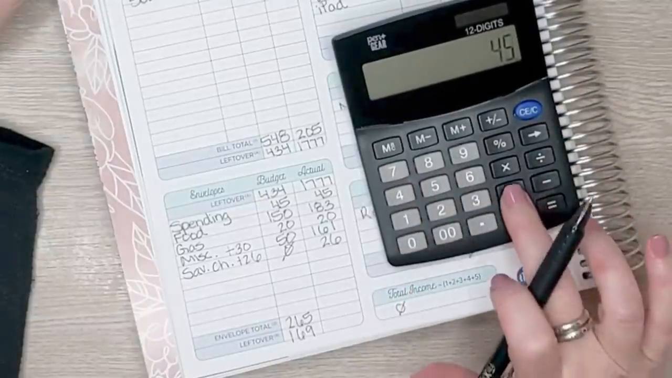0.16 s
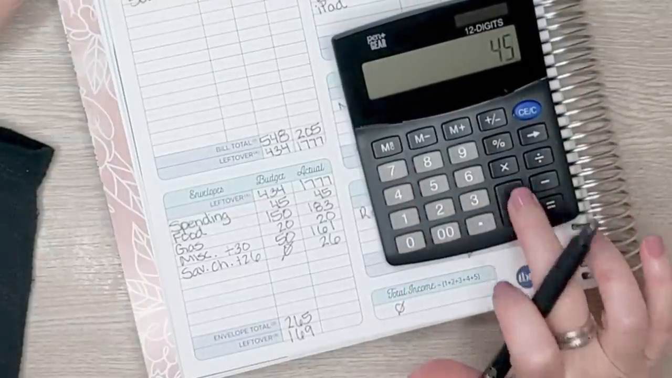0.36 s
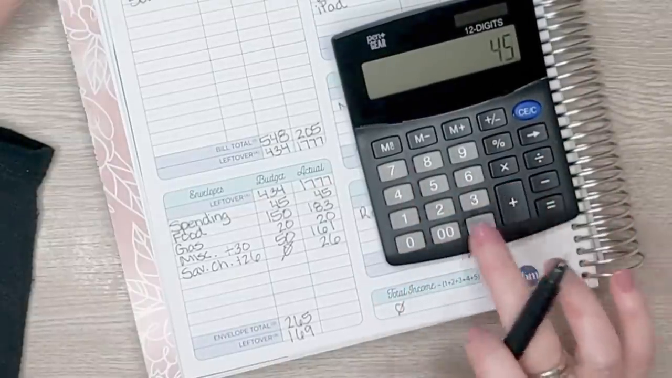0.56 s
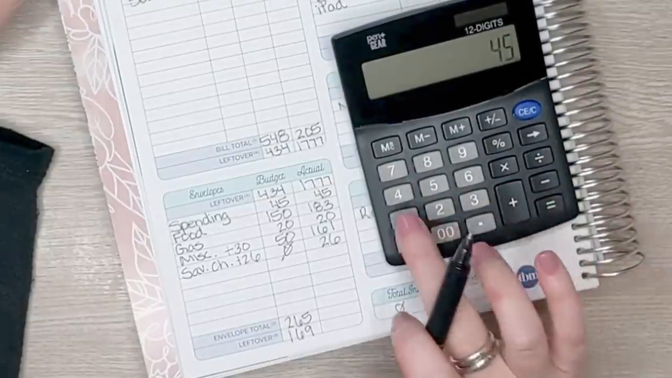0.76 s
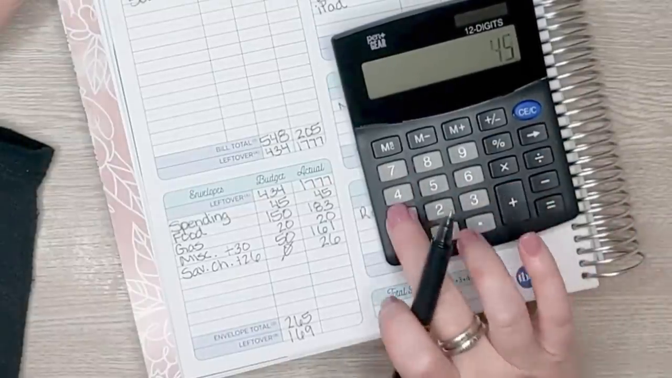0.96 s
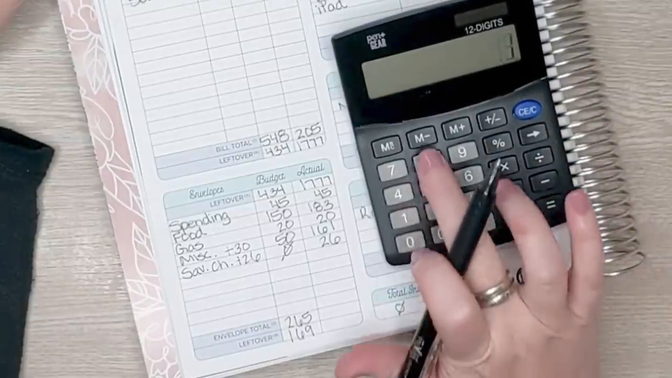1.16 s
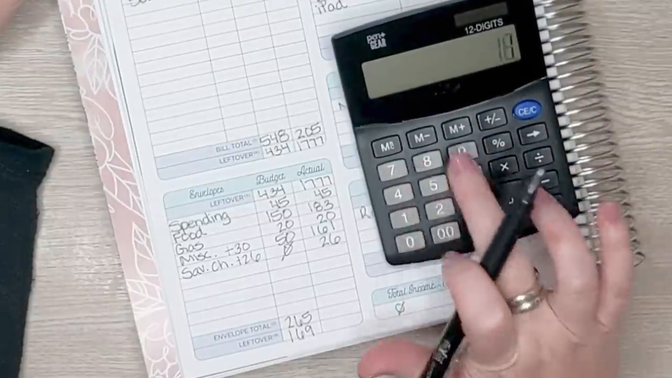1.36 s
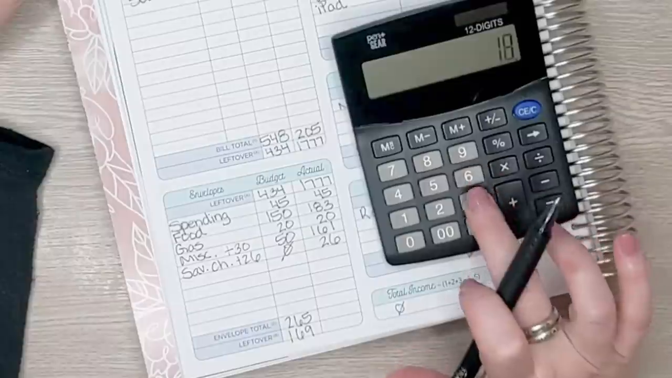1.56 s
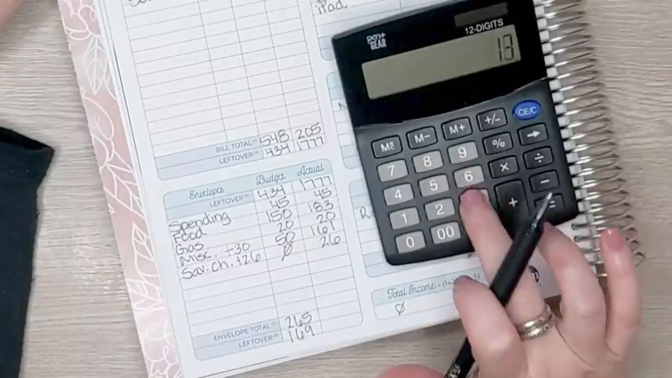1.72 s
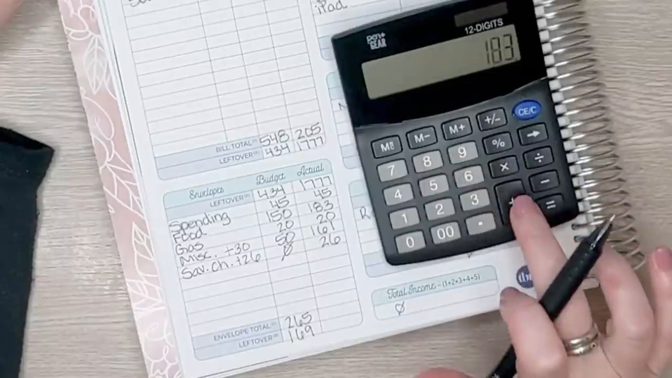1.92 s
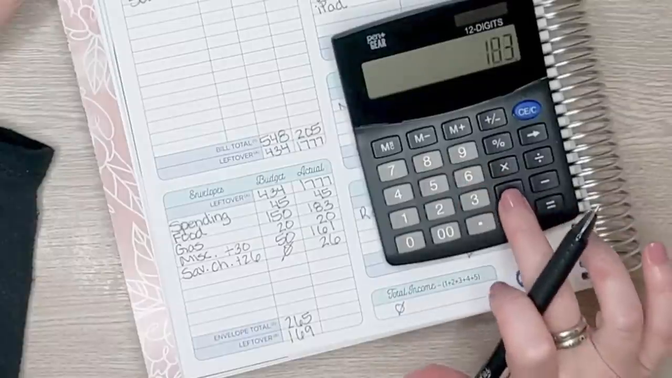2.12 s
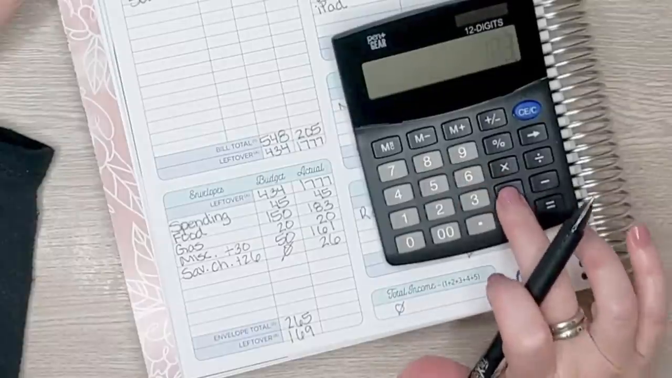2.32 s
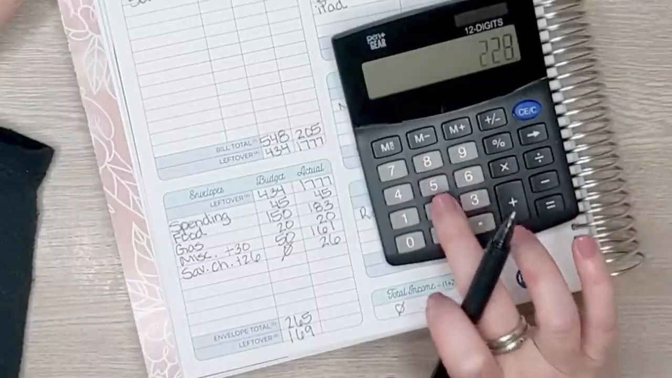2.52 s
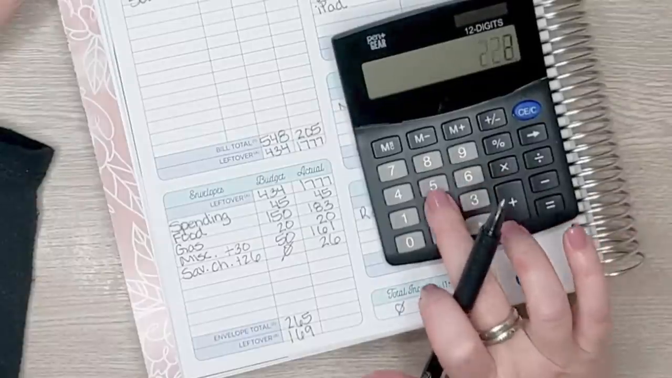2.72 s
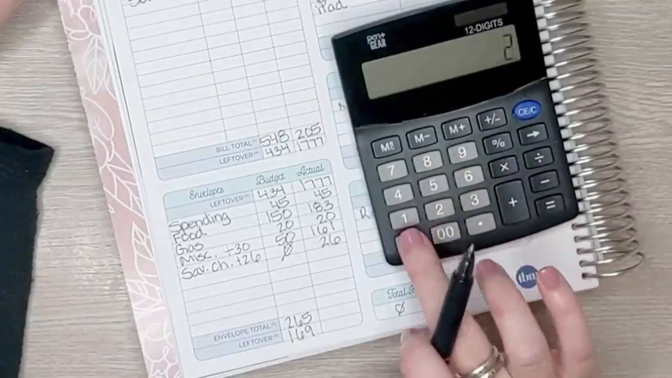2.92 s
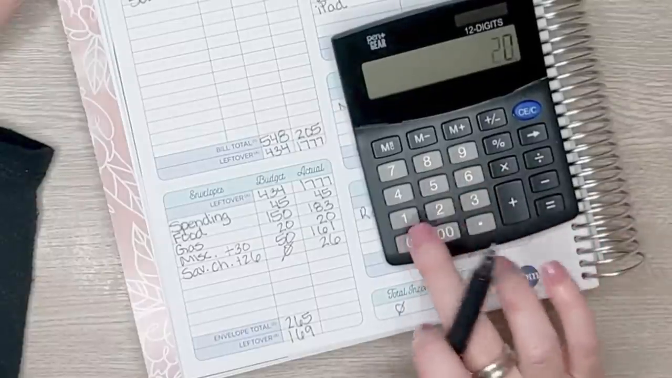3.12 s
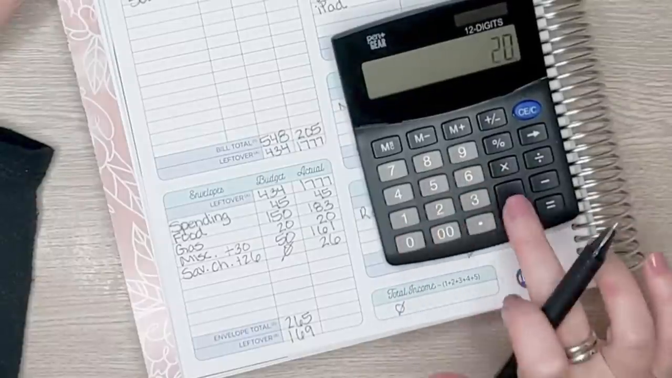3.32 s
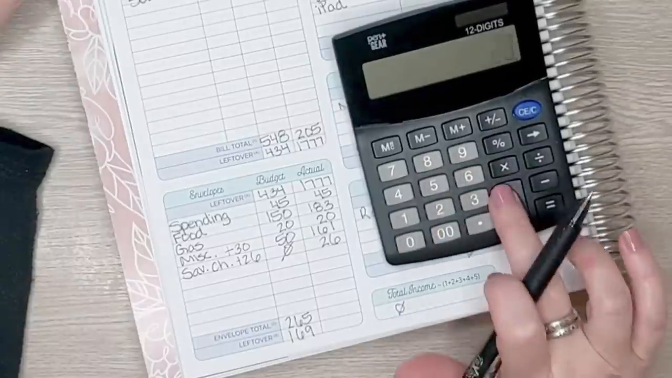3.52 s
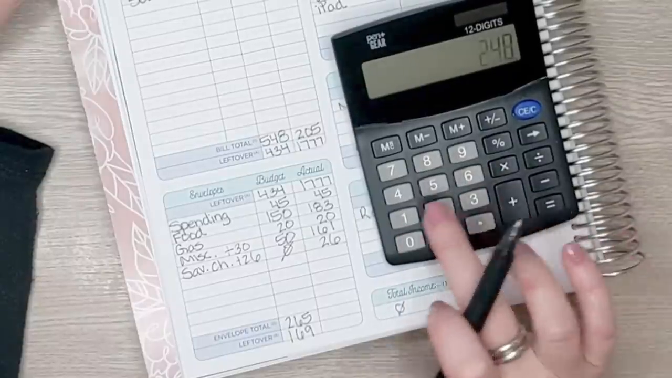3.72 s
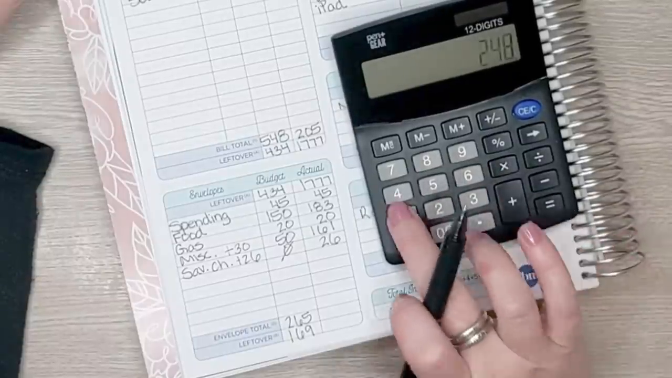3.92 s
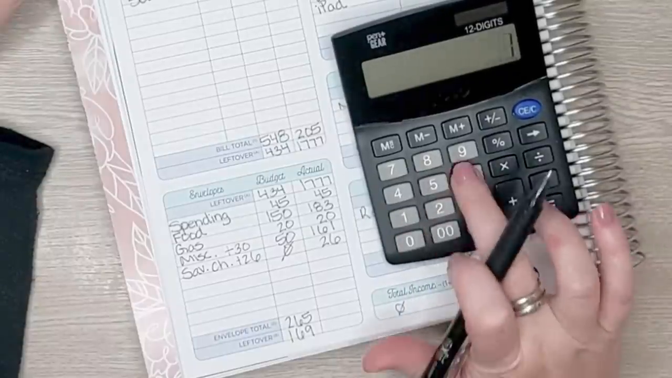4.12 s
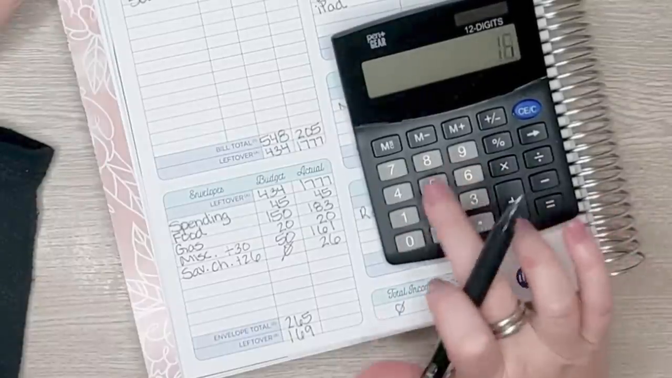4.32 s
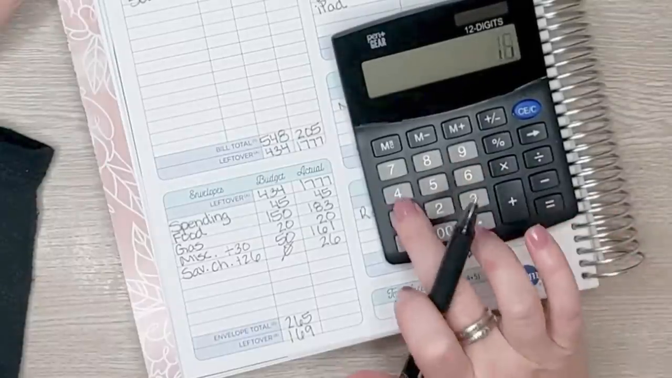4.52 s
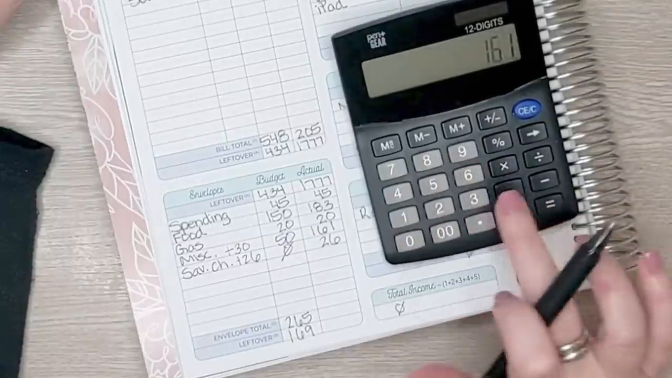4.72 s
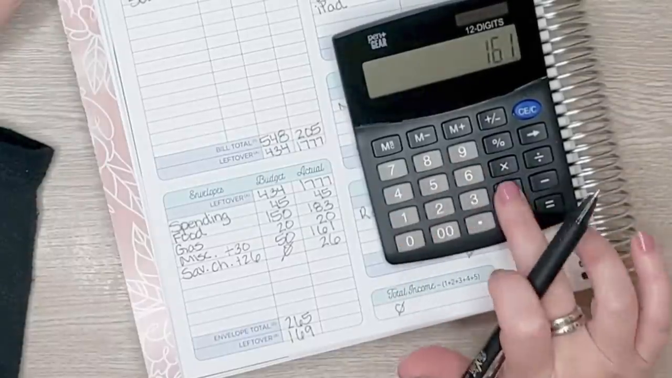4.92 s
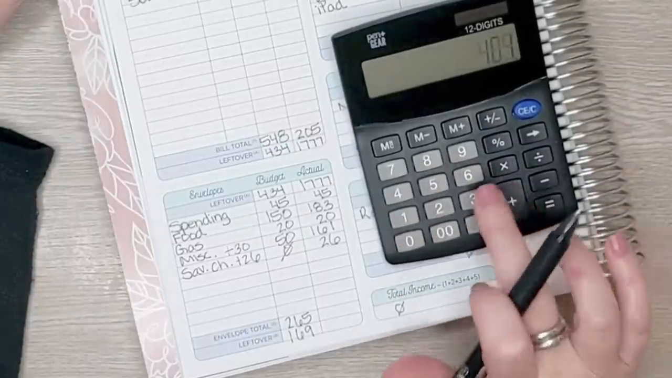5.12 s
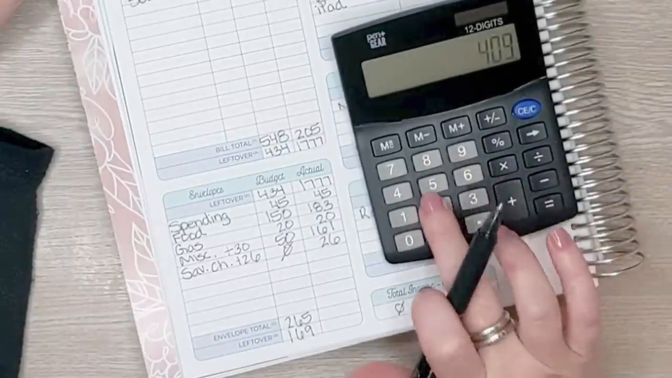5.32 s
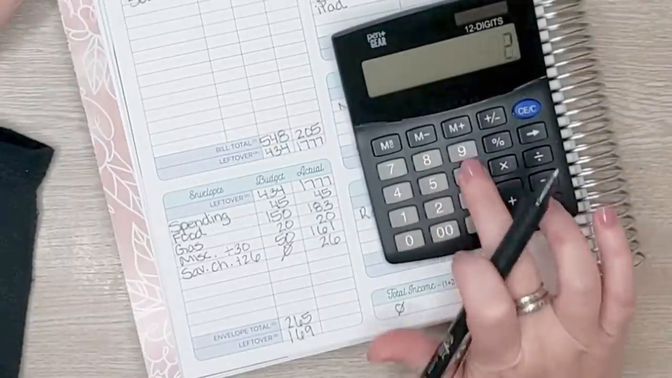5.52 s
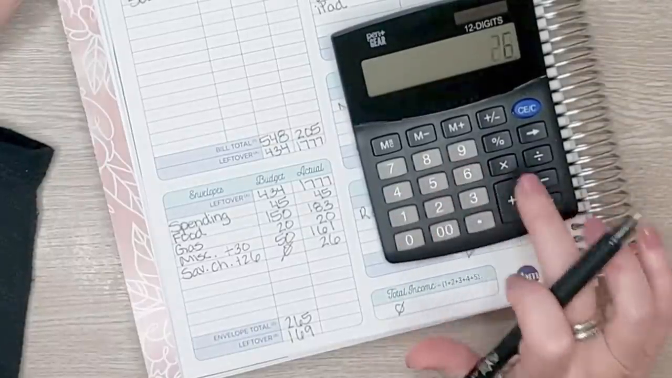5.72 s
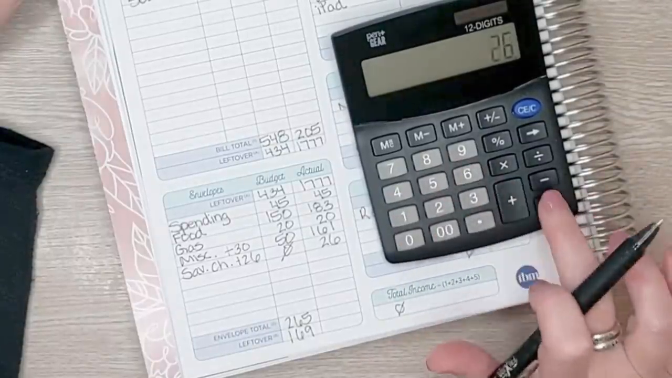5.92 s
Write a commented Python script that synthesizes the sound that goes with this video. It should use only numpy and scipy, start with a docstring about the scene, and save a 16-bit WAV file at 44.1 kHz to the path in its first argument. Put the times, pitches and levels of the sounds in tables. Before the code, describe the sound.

The plastic keys of a desk calculator are pressed about fourteen times, close to the microphone. Each press is a tiny scrape and a short clack, followed roughly a tenth of a second later by a brighter click as the key springs back. Some presses add a soft, hollow thump on the desk. A firm press opens at 0.3 seconds, then lighter ones come at 1.0, 1.3 and 1.7. Another at 2.3 has a sharp release. Presses follow at 2.7, 3.1 and 3.6, then quicken at 4.0, 4.3 and 4.6. A firm, scraping press at 5.0 ends in a snappy release and a brief finger slide around 5.2. Two last presses land at 5.4 and 5.6. Throughout, the hand brushes very softly over keys and paper. The small, quiet room gives each click a short echo, above a low rumble, thin hiss and faint motor hum.

```python
"""Desk calculator keys

A finger works the plastic keys of a calculator lying on a paper planner, close to a phone.
Each key scrapes in its guide, bottoms out with a clack that rings case and room and thumps the desk,
then springs back with a brighter click. The small, quiet room answers every click over the soft
brush of the hand, a low rumble and a faint motor hum."""
import sys
import numpy as np
from scipy import signal
from scipy.fft import rfft, irfft, next_fast_len
from scipy.io import wavfile

SR = 44100
rng = np.random.default_rng(int(sys.argv[2]) if len(sys.argv) > 2 else 0)


def wrap_up_sound(samples):
    """Save the sound to the file named by the first command line argument, as 16-bit audio."""
    columns = np.atleast_2d(samples).T
    # keep every value between -1 and 1, then stretch to whole-number steps
    tamed = np.clip(columns, -1, 1)
    steps = np.round(tamed * 32767).astype(np.int16)
    wavfile.write(sys.argv[1], SR, steps)


N = 267290


def undb(db):
    """Decibels to gain."""
    return 10 ** (np.asarray(db) / 20)


def rms(x):
    """Root mean square."""
    return np.sqrt(np.mean(x ** 2)) + 1e-12


def clock(length_s):
    """Sample times over a stretch."""
    return np.arange(int(length_s * SR)) / SR


def fade(t, t60):
    """Exponential decay, 60 dB in t60 seconds."""
    return np.exp(-np.log(1000) * t / t60)


def swell(centre_s, width_s):
    """A smooth rise and fall, 1 at its centre."""
    return np.exp(-((np.arange(N) / SR - centre_s) / width_s) ** 2)


def bump(f, hz, width_hz):
    """Shape of one resonance, 1 at its centre."""
    return 1 / (1 + (2 * (f - hz) / width_hz) ** 2)


def along(points, hz):
    """Read (Hz, value) points on a log-frequency axis."""
    f, value = np.transpose(points)
    return np.interp(np.log(np.maximum(hz, 1)), np.log(f), value)


def colour(x, points, depth=1, lag_s=0):
    """EQ by (Hz, dB) points scaled by depth, with an optional delay."""
    size = next_fast_len(x.shape[-1])
    f = np.arange(size // 2 + 1) * SR / size
    response = undb(depth * along(points, f)) * np.exp(-2j * np.pi * f * lag_s)
    return irfft(rfft(x, size) * response, size)[..., :x.shape[-1]]


def add(track, start_s, x):
    """Mix a sound in at a time."""
    i = int(start_s * SR)
    track[..., i:i + x.shape[-1]] += x[..., :N - i]


# keys hitting their stop:
# start_s, key, strength_db, bright_db_per_octave, snap_db, cap_hz, cap_db, scrape_db
PRESSES = [(0.319, "+", -36.5, -1.5, -0.5, 2920, 10.5, -43), (1.011, "1", -47.5, 0.5, 4, 1150, 5, -42),
           (1.318, "8", -49, -3, -9, 930, 9.5, -43.5), (1.7232, "3", -50.5, 2, 0, 2200, 6.5, -51),
           (2.3223, "+", -47.5, -2.5, -2, 860, 11, -41.5), (2.7415, "2", -46, 1.3, 1, 1240, 9.5, -38),
           (3.063, "0", -50, 0.5, -7, 1280, 4.5, -51), (3.5763, "+", -45, 1.2, -0.5, 1200, 6, -58),
           (3.9772, "1", -47, .5, 2, 1000, 2, -54), (4.2557, "6", -45, -1.1, 2, 865, 2, -37.5),
           (4.5543, "1", -40, -2.3, 9, 1200, 8, -55), (5.039, "+", -40, -2, -2, 1270, 3, -29),
           (5.3805, "2", -50.5, 1.8, -11, 1480, 8.5, -49), (5.634, "6", -40.5, 1, 4, 1530, 0.5, -56)]
# tone of a press, against its strength: level_db for each register (body, knock, clack, tick, edge)
PRESS_TONE = [-11.5, 0, 0, -4.5, -16]
# hollow knock of the calculator's foot, against the thump: level_db for each register
FOOT_TONE = [-7, -2.5, -21, -32, -42]


def presses(clicks, desk, left_keys="0124578", rock_db=9.5):
    """Keys bottom out: mixes in their scrapes and thumps, returns blows as (start_s, ring, taps)."""
    blows = []
    for start_s, key, strength_db, bright_db, snap_db, cap_hz, cap_db, scrape_db in PRESSES:
        rocks = key in left_keys  # keys on the left rock the calculator more
        thump_db = -60 + 0.63 * (strength_db + 46) + rock_db * rocks  # a medium press is -46 dB
        add(clicks, *scrape(start_s, scrape_db, rise_s=0.0039, rub_db=-39, rub_s=0.008))
        add(desk, start_s + 0.0036, undb(thump_db) * thump())
        ring = click_ring(blow_levels(PRESS_TONE, strength_db, bright_db, snap_db), cap_hz, cap_db)
        # a loosely held key sounds brighter and chatters longer
        chatter_t60 = 0.023 * 2 ** (bright_db / 5.5)
        taps = chatter(chatter_t60, strike_db=-9, seat_s=0.0028, seat_db=-11)
        blows.append((start_s, ring, taps))
        if rocks:  # the foot lands a moment later
            ring = click_ring(np.array(FOOT_TONE) + thump_db, peak_hz=480, peak_db=5.5)
            taps = chatter(t60=0.03, strike_db=-0.5, seat_s=0.0034, seat_db=-19)
            blows.append((start_s + 0.011, ring, taps))
    return blows


# keys springing back: start_s, strength_db, bright_db_per_octave, snap_db, cap_hz, cap_db
RELEASES = [(0.4487, -38.5, 0, 3.5, 1560, 11), (1.1035, -46, 1, -4, 2000, 6),
            (1.411, -44, .5, 7.5, 2100, 1), (1.849, -47, 0, -1, 2400, 2.5), (2.4433, -38, 0.54, 6, 7000, 7),
            (2.873, -49.5, -0.3, -5, 1560, 3), (3.2173, -46.5, 1.8, -5, 480, 14),
            (3.728, -53, -4, -1, 1360, 2), (4.089, -41.5, 0.5, 3, 3550, 6.5),
            (4.362, -51, -1.5, 11.5, 1390, 7), (4.667, -43, 2.2, -5, 1820, 6.5),
            (5.175, -37, 2.5, 2.5, 2420, 5.5), (5.183, -40, -.2, 12, 6800, 11),
            (5.492, -51, 0, -11, 1350, 4), (5.738, -49.5, -4, -1, 2520, 5.5)]
# tone of a release, against its strength: level_db for each register
RELEASE_TONE = [-15, -3, -0.5, -2.5, -17.5]


def releases(clicks):
    """Keys spring back against the face plate: mixes in their scrapes, returns their blows."""
    blows = []
    for start_s, strength_db, bright_db, snap_db, cap_hz, cap_db in RELEASES:
        add(clicks, *scrape(start_s, level_db=-49.5, rise_s=0.0036, rub_db=-16.5, rub_s=0.086))
        ring = click_ring(blow_levels(RELEASE_TONE, strength_db, bright_db, snap_db), cap_hz, cap_db)
        taps = chatter(t60=0.028, strike_db=-18, seat_s=0.0015, seat_db=-7.5)
        blows.append((start_s, ring, taps))
    return blows


# taps of a tilted key's edge: start_s, strength_db, bright_db_per_octave, cap_hz
EDGE_TAPS = [(0.321, -45, -4, 1400), (1.347, -64, 4.5, 800), (1.744, -57, -2, 1150),
             (2.3162, -53, -.5, 1650), (3.209, -49, 1.5, 1320), (3.5706, -49, 3, 3100),
             (4.5495, -47.5, 0.5, 1210)]
# tone of an edge tap, against its strength: level_db for each register
EDGE_TONE = [-4, -1.5, 0, -0.5, -18]


def edge_taps():
    """A key pushed off-centre tilts, and one edge taps just before or after the main blow."""
    blows = []
    for start_s, strength_db, bright_db, cap_hz in EDGE_TAPS:
        ring = click_ring(blow_levels(EDGE_TONE, strength_db, bright_db), cap_hz, peak_db=10)
        taps = chatter(t60=0.019, strike_db=-6.5, seat_s=0.0027, seat_db=-20)
        blows.append((start_s, ring, taps))
    return blows


# the five registers of a click (body, knock, clack, tick, edge): centre_hz, width_hz
REGISTERS = [(450, 450), (1100, 900), (2600, 2400), (6000, 5000), (12500, 7000)]


def blow_levels(tone_db, strength_db, bright_db, snap_db=0):
    """Register levels: a harder contact tilts them upwards, a sharp corner adds snap to the highest."""
    hz = np.transpose(REGISTERS)[0]
    octaves = np.log2(hz / np.median(hz))
    return np.array(tone_db) + strength_db + bright_db * octaves + snap_db * (hz == hz.max())


# resonances of the plastic case and the small room that colour each click: pitch_hz, width_hz, gain_db
CLICK_RESONANCES = [(361, 42, 5.5), (467, 55, 4.5), (492, 43, 5), (589.3, 29, 10), (710, 37, -0.5),
                    (742, 3.2, 10), (817, 65, 6), (874, 18, 5.5), (981, 25, 6), (1130, 70, -1),
                    (1287, 105, 4), (1423, 18, -4), (1760, 125, -2), (2034, 15, 5.5), (2260, 150, 3.5),
                    (2674, 37, 6), (2874, 174, 4), (3090, 50, 6.5), (3410, 770, 6), (4330, 1630, 2),
                    (5840, 2100, 6), (7070, 130, 2.5), (8100, 380, 4), (10100, 3300, 0.5),
                    (13100, 2800, 4.5)]


def click_ring(levels_db, peak_hz, peak_db, attack_s=0.008, low_cut_hz=320, size=4096):
    """The ring of case and room after one tap, with a peak for the key cap or foot that strikes."""
    f = np.arange(size // 2 + 1) * SR / size
    hz, width_hz = np.transpose(REGISTERS)
    # a register's level is its power over the attack, spread across its width
    db = along(np.c_[hz, levels_db + 10 * np.log10(attack_s * SR * SR / 2 / width_hz)], f)
    db += sum(gain_db * bump(f, centre, width) for centre, width, gain_db in CLICK_RESONANCES)
    db += peak_db * bump(f, peak_hz, 0.19 * peak_hz)
    # so small a case radiates little bass
    gain = undb(db) * (f + 1) ** 3 / np.hypot(f ** 3, low_cut_hz ** 3)
    # minimum phase: a sudden start, then the resonances die away
    cepstrum = irfft(np.log(gain + 1e-7))
    cepstrum[1:size // 2] *= 2
    cepstrum[size // 2 + 1:] = 0
    return irfft(np.exp(rfft(cepstrum)))


def chatter(t60, strike_db, seat_s, seat_db, grain_db=2.5, grip_s=0.0008):
    """A loose part strikes, chatters in ever smaller taps and seats with a second blow; unit energy."""
    t = clock(0.03)
    taps = rng.standard_normal(len(t)) * undb(grain_db * rng.exponential(size=len(t)))
    # the chatter builds while the part tilts onto its stop and dies as it seats
    taps *= (1 - np.exp(-t / grip_s)) * fade(np.maximum(t - seat_s / 2, 0), t60)
    taps /= np.linalg.norm(taps)
    taps[int(grip_s * SR)] += undb(strike_db)
    taps[int(seat_s * (0.7 + 0.6 * rng.random()) * SR)] -= undb(seat_db)
    return taps / np.linalg.norm(taps)


def scrape(blow_s, level_db, rise_s, rub_db, rub_s):
    """A key rubs along its guide in tiny slips that swell up to the blow; returns start and sound."""
    t = clock(0.045)
    slips = rng.standard_normal(len(t)) * undb(2 * rng.exponential(size=len(t)))
    slips = colour(slips, [(200, -51), (500, -2), (1300, -1.5), (3300, -1), (7000, -17.5), (15000, -38)])
    envelope = np.exp(-t / rise_s) + undb(rub_db) * np.exp(-t / rub_s)
    rub = undb(level_db) * slips / rms(slips) * envelope
    return blow_s - t[-1], rub[::-1]


def thump(hz=108, rise_s=0.007, t60=0.22):
    """The finger's push rocks calculator and desk."""
    t = clock(0.3)
    pitch_hz = hz * (1 + 0.052 * rng.standard_normal())
    envelope = (1 - np.exp(-(t / rise_s) ** 2)) * fade(t, t60)
    thud = np.sin(2 * np.pi * pitch_hz * t) * envelope
    return thud / rms(thud[:int(0.04 * SR)])


def hand(grain_db=3, rest_db=-73.5, press_db=-81, slide_db=-56):
    """The hand brushes softly over keys and page all the time, and more around each press."""
    grains = np.repeat(rng.standard_normal(N // 256 + 1), 256)[:N]
    friction = rng.standard_normal(N) * undb(grain_db * grains)
    brush = colour(friction, [(150, -10), (450, -3), (1300, -9), (3500, -18),
                              (8000, -14.5), (15000, -50)])
    pressing = sum(swell(start_s, width_s=0.18) for start_s, *_ in PRESSES)
    slide = swell(centre_s=5.23, width_s=0.033)  # the finger slides off a key
    return brush / rms(brush) * (undb(rest_db) + undb(press_db) * pressing + undb(slide_db) * slide)


def echo(tail_db=-6.5, desk_db=-9, ceiling_db=-17, t60=0.37, treble_t60=0.33, ceiling_s=0.0076):
    """One click's stereo echoes: scatter off the desk, a ceiling bounce, then a diffuse tail."""
    t = clock(0.45)
    noise, scatter = rng.standard_normal((2, 2, len(t)))
    dull = colour(noise, [(5000, 0.5), (14000, -35)])
    build_up = np.clip((t - 0.003) / 0.0081, 0, 1)
    tail = (dull * fade(t, t60) + (noise - dull) * fade(t, treble_t60)) * build_up
    desk = scatter * fade(t, 0.018) * (t > 0.0005)
    ceiling = noise * fade(np.abs(t - ceiling_s), 0.024)
    layers = [(tail_db, tail), (desk_db, desk), (ceiling_db, ceiling)]
    return sum(undb(db) * x / np.linalg.norm(x[0]) for db, x in layers)


# colour of the room's reverb: frequency_hz, gain_db
ROOM_EQ = [(150, -8), (400, 1.5), (900, 1), (2000, 0.5), (3200, -3.5), (6000, -1.5), (9000, 1), (15000, -3)]


def room(blows):
    """The small room answers each click; its long waves reach both microphones alike."""
    echoes = np.zeros((2, N))
    for start_s, ring, _ in blows:
        add(echoes, start_s, signal.fftconvolve(ring[None], echo()))
    left, right = colour(echoes, ROOM_EQ)
    mid = colour((left + right) / 2, [(250, 2), (900, 0)])
    side = colour((left - right) / 2, [(250, -10), (900, 0.5)])
    return np.array([mid + side, mid - side])


# spectrum of the room tone: frequency_hz, gain_db
AIR_EQ = [(15, -47), (25, -30), (44, -2.5), (64, 2), (82, -5.5), (117, -5.5), (285, -16), (335, -14),
          (531, -22.5), (659, -17.5), (796, -23), (1370, -25), (2050, -27.5), (3080, -30), (16000, -43)]
# further colour of its stereo side signal: frequency_hz, gain_db
AIR_SIDE_EQ = [(60, -9.5), (110, -10), (200, -2), (380, -2), (700, 0), (1290, 3.5), (2380, 0.5),
               (4400, 0.5), (8120, 2.5), (15000, -0.5)]


def room_tone(level_db=-59.5, side_db=-1.5):
    """A low rumble near the centre under a thin, wide hiss."""
    mid, side = colour(rng.standard_normal((2, N)), AIR_EQ)
    side = undb(side_db) * colour(side, AIR_SIDE_EQ)
    return np.array([mid + side, mid - side]) * undb(level_db) / rms(mid)


# partials of the motor hum: pitch_hz, level_db
HUM_PARTIALS = [(55.6, -73.5), (111.3, -70), (222.6, -75), (334, -75.5)]


def motor_hum(waver_rad=0.24):
    """A faint motor hums, its partials wavering slightly together."""
    t = np.arange(N) / SR
    drift = np.interp(t, np.linspace(0, t[-1], 20), rng.standard_normal(20))
    hum = np.zeros(N)
    for k, (hz, level_db) in enumerate(HUM_PARTIALS, start=1):
        phase = 2 * np.pi * (hz * t + rng.random()) + waver_rad * drift * k
        hum += np.sqrt(2) * undb(level_db) * np.sin(phase)
    return hum


# colour of the left microphone port, mirrored more gently on the right: frequency_hz, gain_db
PORT_EQ = [(300, -2.5), (600, 0), (900, 2), (1100, 0), (1320, 3.5), (1750, 2.5), (2300, -5.5), (2900, -0.5),
           (5000, -0.5), (8500, -4), (13000, 0.5)]


def phone_ports(near, lag_s=0.00011, spread_rad=1.65, treble_hz=7000):
    """The calculator lies to the right, so the phone's left port hears it a little later."""
    left = colour(near, PORT_EQ, lag_s=lag_s)
    right = colour(near, PORT_EQ, depth=-0.4)
    # short waves scatter round the phone's body: their phase at the far port wanders with frequency
    f = np.arange(N // 2 + 1) * SR / N
    wander = np.interp(f, np.linspace(0, SR / 2, 36), rng.standard_normal(36))
    phase = spread_rad * wander * np.minimum(f / treble_hz, 1) ** 2
    return np.array([irfft(rfft(left) * np.exp(1j * phase), N), right])


def scene():
    """Key clicks and the hand up close, over desk thumps, reverb, room tone and hum."""
    clicks, desk = np.zeros(N), np.zeros(N)
    blows = presses(clicks, desk) + releases(clicks) + edge_taps()
    for start_s, ring, taps in blows:
        add(clicks, start_s, signal.fftconvolve(ring, taps))
    reverb = room(blows)
    return phone_ports(clicks + hand()) + desk + reverb + room_tone() + motor_hum()


def record(dry):
    """The phone cuts the top above 16 kHz."""
    return signal.sosfilt(signal.ellip(10, 0.2, 70, 16000, fs=SR, output="sos"), dry)


dry = scene()
out = record(dry)
wrap_up_sound(out)
```